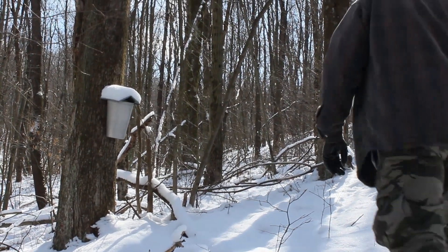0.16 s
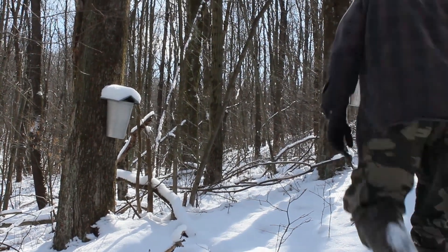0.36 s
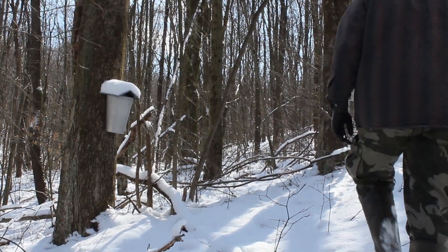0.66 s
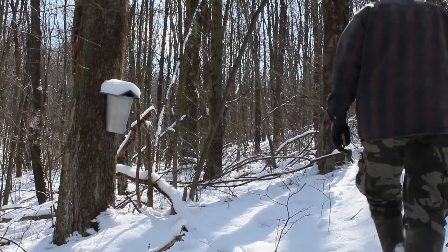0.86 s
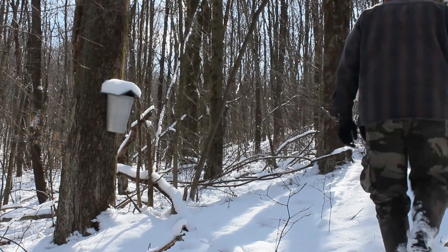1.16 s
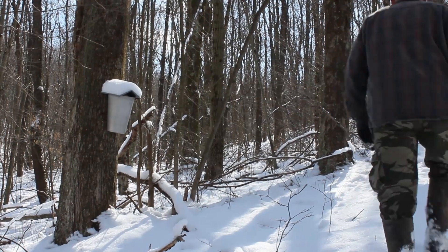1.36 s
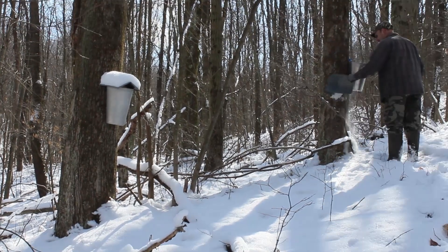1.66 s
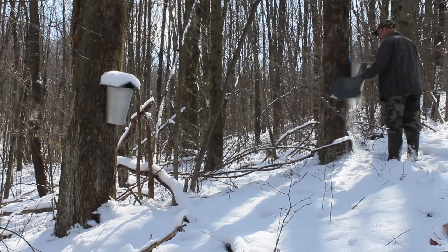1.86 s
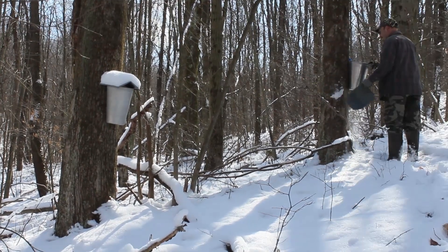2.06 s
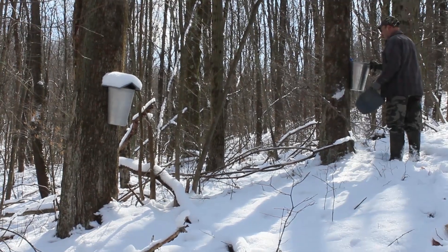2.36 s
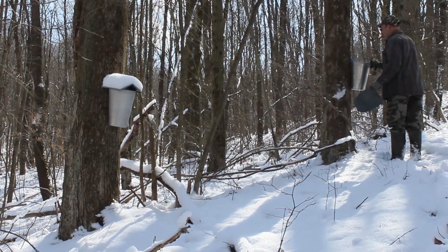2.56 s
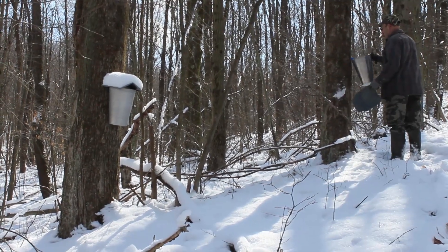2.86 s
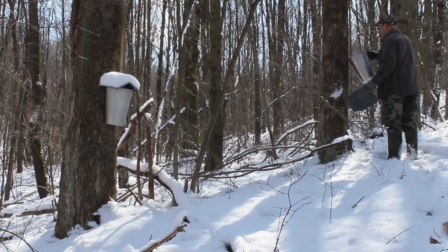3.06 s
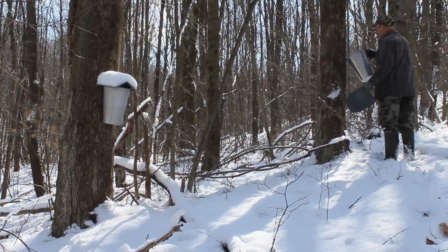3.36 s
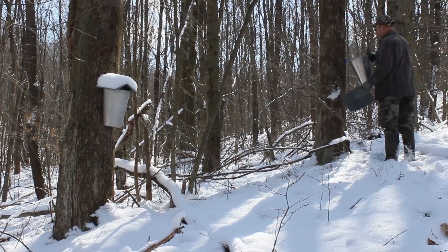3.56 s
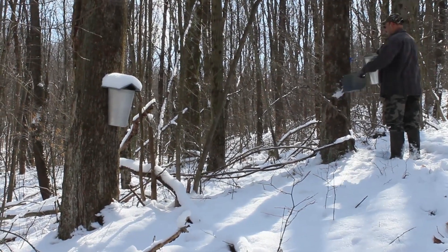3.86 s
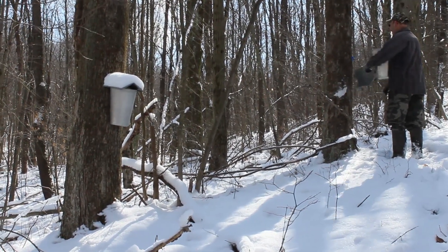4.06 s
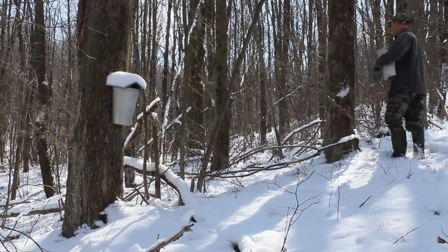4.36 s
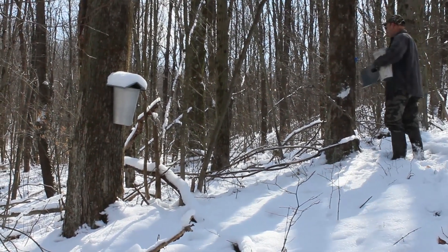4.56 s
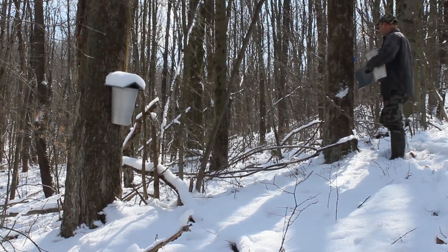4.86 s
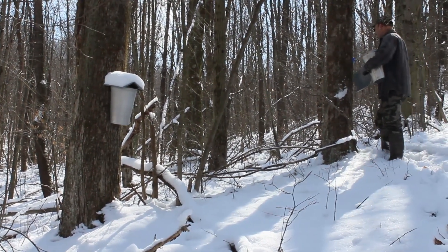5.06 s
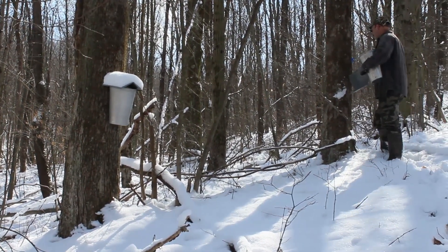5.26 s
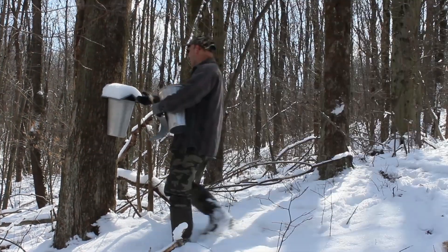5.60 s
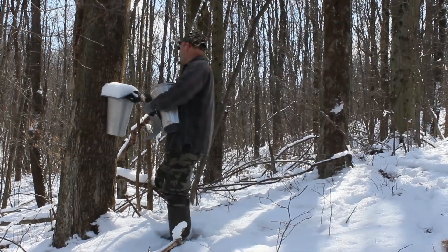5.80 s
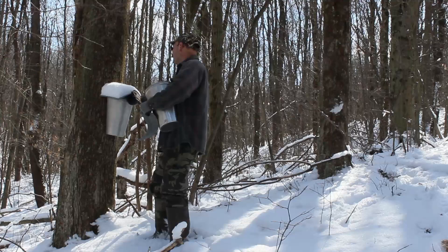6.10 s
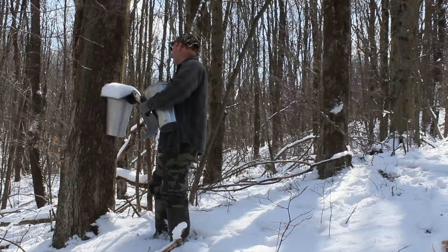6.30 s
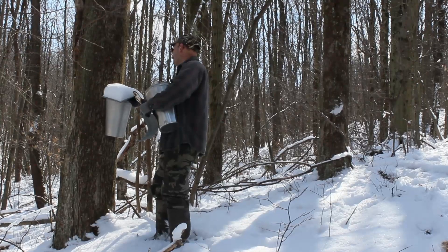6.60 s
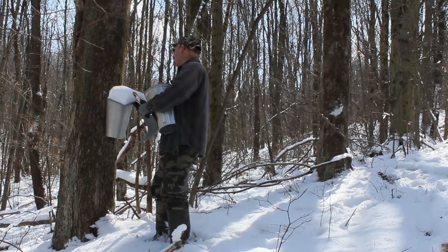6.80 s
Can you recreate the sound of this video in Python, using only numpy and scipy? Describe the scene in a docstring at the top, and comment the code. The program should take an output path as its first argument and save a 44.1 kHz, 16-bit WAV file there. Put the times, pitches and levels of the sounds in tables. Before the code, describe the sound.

For the first second, boots pass close by in packed snow with dull thuds, small snaps and a soft crunch. A few tiny, brittle ticks of crust or twigs come near 1.4 seconds. At about 1.7 seconds a tin lid some metres off gives a loud, briefly ringing clank, the strongest sound, with a short echo from the trees. Shorter, damped knocks of a metal bucket follow: a clear one at 2.2 seconds, lighter ones near 2.8 and 3.3, and another clear one at 4.2. Quieter steps thud and crunch from about 4.5 to 6 seconds. After a faint tin tap near 6.3, a glove softly scrapes snow off a nearer lid from 6.5 to 7 seconds, grainy with a slight metallic ring. Throughout, light wind rumbles in small gusts over a faint woodland hush and microphone hiss.

```python
"""Boots and tin in snowy woods

Boots thud and crunch past as the snow gives way. Some metres off, a man knocks a tin lid and bucket together;
the lid rattles against a tree trunk, damped, until a last free clank rings out, and tree trunks echo the
knocks. At the end snow scrapes off a nearer lid. Light wind rumbles, the woods murmur and each microphone
hisses."""
import sys
import numpy as np
from scipy import signal
from scipy.fft import rfft, irfft, next_fast_len
from scipy.io import wavfile
from scipy.ndimage import uniform_filter1d

SR = 44100
rng = np.random.default_rng(int(sys.argv[2]) if len(sys.argv) > 2 else 0)


def transcribe(signal):
    """Save signal, clipped to [-1, 1], as a 16-bit WAV file at the path in sys.argv[1]."""
    frames = np.atleast_2d(signal).T
    limited = np.clip(frames, -1, 1)
    pcm = np.round(limited * 32767).astype(np.int16)
    wavfile.write(sys.argv[1], SR, pcm)


N = 305875
T = np.arange(N) / SR


def undb(db):
    return 10 ** (np.asarray(db) / 20)


def unit(x):
    return x / np.sqrt(np.mean(x ** 2))


def band(x, hz, width_hz):
    """Keep the sound near one pitch."""
    return signal.lfilter(*signal.iirpeak(hz, hz / width_hz, fs=SR), x)


def steep_band(x, hz, width_hz):
    return band(band(x, hz, width_hz), hz, width_hz)


def shaped_noise(tone, channels=1):
    """Steady noise whose tone follows (Hz, dB) points."""
    size = next_fast_len(N)
    hz, db = np.transpose(tone)
    pitches = np.arange(1, size // 2 + 2) * SR / size
    gain = undb(np.interp(np.log(pitches), np.log(hz), db))
    spectrum = rfft(rng.standard_normal((channels, size)))
    return unit(irfft(spectrum * gain, size)[:, :N])


def wander(per_second):
    """A smooth random drift up and down."""
    hold = int(SR / per_second)
    steps = np.repeat(rng.standard_normal(N // hold + 1), hold)
    return uniform_filter1d(uniform_filter1d(steps, hold), hold)[:N]


def fade(t, fade_s):
    """Die away by 60 dB in the fade time."""
    return np.exp(-np.log(1000) * t / fade_s)


def add(out, start, sound, peak_db):
    i = int(start * SR)
    sound = sound[:N - i]
    out[i:i + len(sound)] += undb(peak_db) * sound / np.abs(sound).max()


# Gusts of wind. Each row: time of the peak in seconds, level in dB.
WIND_GUSTS = [(0.33, -64), (0.77, -51.5), (1.48, -63), (1.9, -46.5), (2.45, -66), (2.92, -55.5),
              (3.17, -63), (3.58, -65), (4.23, -59), (5.78, -70), (6.93, -66)]
def wind(breeze_db=-67, waver_db=5, gust_s=0.048):
    """Light wind makes a low, wavering rumble that swells in short gusts."""
    rumble = shaped_noise([(5, -11), (20, 2.5), (40, -25), (70, -15), (110, -38), (200, -56),
                           (1000, -97.5)])[0]
    breeze = undb(breeze_db + waver_db * wander(7.6))
    gusts = sum(undb(db) * np.exp(-((T - time) / gust_s) ** 2) for time, db in WIND_GUSTS)
    return rumble * (breeze + gusts)


# The tone of the woods. Each row: pitch in Hz, relative level in dB.
MURMUR_TONE = [(50, 1), (90, 1), (142, 0), (320, 0), (500, -5.5), (850, -7), (1500, -12.5), (2500, -18.5),
               (4500, -26.5), (8000, -33), (16000, -35)]
# Their slow rise and fall. Each row: time in seconds, level in dB.
MURMUR_LEVELS = [(0.0, -57), (0.55, -59.5), (1.0, -59), (4.5, -57.5), (6.2, -59)]
def woods():
    """The woods give a soft murmur that swells a little."""
    murmur = shaped_noise(MURMUR_TONE)[0] * undb(wander(14))
    return murmur * undb(np.interp(T, *np.transpose(MURMUR_LEVELS)))


# Boots on packed snow. Each row: start in seconds, peak in dB, pitch in Hz, snap in dB above that peak.
BOOT_THUDS = [(0.082, -36.5, 464, -2), (0.121, -44, 177, 11.5), (0.133, -48, 127, -1),
              (0.199, -47.5, 204, 3), (0.216, -45, 159, 5.5), (0.334, -51, 563, 8.5),
              (0.692, -36, 360, -3.5), (0.702, -35, 303, -3.5), (0.753, -39, 280, -2),
              (0.808, -38.5, 139, -2.5), (0.871, -39.5, 173, -12), (0.89, -48.5, 189, -7),
              (0.967, -34, 352, -8), (1.044, -46, 171, 3), (1.467, -54, 141, -14), (4.556, -42, 187, -38),
              (4.737, -47.5, 264, -17), (4.879, -48, 166, -21), (5.329, -50, 139, -14),
              (5.609, -43.5, 188, -1.5), (5.742, -44.5, 410, -1)]
def boots(fade_cycles=5.7):
    """Packed snow gives way with a dull knock, snapping at the start and again as it springs back."""
    out, t = np.zeros(N), T[:SR // 10]
    for start, peak_db, hz, snap_db in BOOT_THUDS:
        thud = np.cos(2 * np.pi * hz * t) * fade(t, fade_cycles / hz) * np.minimum(t / 0.0013, 1)
        add(out, start, thud, peak_db)
        for delay, drop_db in ((.0012, 0), (.0012 + 1 / hz, -3)):
            crumbs = .15 * rng.standard_normal(len(t)) * fade(t, .01)
            snap = steep_band((t == 0) + crumbs, 660, 920)  # one clean break, then crumbs
            add(out, start + delay, snap, peak_db + snap_db + drop_db)
    return out


def trunk_echoes(sound, fade_s=0.39, level_db=-21.5):
    """Tree trunks scatter short echoes, dulled by the snow."""
    t = T[:SR // 2]
    scatter = band(rng.standard_normal((2, len(t))), hz=1290, width_hz=5600)
    middle, side = scatter * fade(t, fade_s) * np.minimum(t / 0.0096, 1)
    echo = middle + 0.011 * side * np.array([[1], [-1]])
    echo /= np.sqrt((echo ** 2).sum() / 2)
    return undb(level_db) * signal.fftconvolve(sound[None], echo, axes=1)[:, :N]


def grains(per_second=3000):
    """Many tiny breaks in the snow, some larger than the rest."""
    breaks = rng.random(N) < per_second / SR
    return breaks * rng.standard_normal(N) * undb(2.2 * rng.exponential(size=N))


# How soft snow and hard crust ring. Each row: pitch in Hz, width in Hz, relative level in dB.
SOFT_TONE = [(290, 250, -2), (620, 500, 0), (1100, 800, -1), (1700, 1000, -4)]
CRUST_TONE = [(2900, 2000, 0), (4400, 1800, -1), (7800, 2200, -1)]
def snow_crackles():
    """Grains of each size ring in their own range: a low crackle for soft snow, a high one for crust."""
    return [unit(sum(undb(db) * unit(steep_band(grains(), hz, width)) for hz, width, db in tone))
            for tone in (SOFT_TONE, CRUST_TONE)]


# Steps in loose snow. Each row: start in seconds, hold in seconds, soft snow in dB, crust in dB.
STEP_CRUNCHES = [(0.1, .02, -63, -79), (0.112, 0.0094, -54, -60.5), (0.262, 0.18, -65.5, -76),
                 (0.857, 0.037, -56, -70), (0.92, 0.12, -63, -81), (1.407, .04, -89, -73),
                 (1.465, 0.0071, -59, -67.5), (5.562, .05, -69.5, -81), (5.79, 0.081, -61, -74),
                 (5.924, 0.053, -69, -72)]
def crunch(soft, crust, rise_db_per_s=600, fall_db_per_s=410):
    """Loose snow crunches under a step: the crackle rises, holds and falls."""
    out = np.zeros(N)
    for start, hold, soft_db, crust_db in STEP_CRUNCHES:
        before, after = np.maximum(start - T, 0), np.maximum(T - start - hold, 0)
        shape = undb(-rise_db_per_s * before - fall_db_per_s * after)
        out += shape * (undb(soft_db) * soft + undb(crust_db) * crust)
    return out


# Ticks of crust and twigs. Each row: start in seconds, peak in dB, treble in dB above that peak.
BRITTLE_TICKS = [(1.4117, -41, 0), (1.435, -40, -16.5), (1.4435, -41.5, 9)]
def ticks():
    """Brittle crust and twigs break with tiny, bright bursts of noise."""
    out, t = np.zeros(N), T[:SR // 10]
    for start, peak_db, treble_db in BRITTLE_TICKS:
        burst = rng.standard_normal(len(t)) * fade(t, 0.0048)
        add(out, start, band(burst, 2150, 1700), peak_db + 0.5)
        treble = steep_band(burst, 7300, 5000) + 1.5 * steep_band(burst, 18000, 5000)
        add(out, start, treble, peak_db + treble_db)
    return out


# Six pitches in Hz, low to high, at which a blow sets how strongly the tin rings.
BLOW_PITCHES = (300, 650, 1000, 1350, 1800, 2600)
# The crack of a blow. Each row: pitch in Hz, width in Hz, relative level in dB, fade time in seconds.
LOW_CRACK_BANDS = [(3300, 1440, 4, 0.044), (4460, 580, 5.5, 0.027), (5470, 3400, -11, 0.064)]
HIGH_CRACK_BANDS = [(7600, 1900, 3, 0.032), (8350, 4900, 0, 0.016), (13200, 4400, -8, 0.022)]
def struck_tin(notes, blows, swell_cycles=1.54, weak_below_hz=486):
    """Each blow rings the tin's own notes in a different mix, over a short crack of crowded high ones."""
    out, t = np.zeros(N), T[:SR // 2]
    hz, db, free_fade_s = np.transpose(notes)[:, :, None]
    swell = np.sin(np.pi / 2 * np.minimum(hz * t / swell_cycles, 1)) ** 2
    ringing = fade(t, free_fade_s) * swell * np.sin(2 * np.pi * hz * t)
    bass_cut = signal.butter(3, weak_below_hz, "high", fs=SR)  # thin tin gives off little bass
    for start, peak_db, *mix_db, low_db, high_db, grip_fade_s in blows:
        blow_db = np.interp(np.log(hz), np.log(BLOW_PITCHES), mix_db)
        gain = undb(db + blow_db + rng.standard_normal(hz.shape))
        clank = (gain * ringing).sum(axis=0) * fade(t, grip_fade_s)  # the glove or the trunk adds its own damping
        add(out, start, signal.lfilter(*bass_cut, clank), peak_db)
        for bands, crack_db in ((LOW_CRACK_BANDS, low_db), (HIGH_CRACK_BANDS, high_db)):
            crack = np.zeros(len(t))
            for pitch, width, band_db, fade_s in bands:
                noise = unit(steep_band(rng.standard_normal(len(t)), pitch, width))
                crack += undb(band_db) * fade(t, fade_s) * noise
            add(out, start, crack * np.minimum(t / 0.00013, 1), peak_db + crack_db + 4)
    return out


# The notes each tin rings with. Each row: pitch in Hz, relative level in dB, free fade time in seconds.
LID_NOTES = [(120, 24, .08), (392, -20, .08), (443, -20, .12), (533, 6, .1), (555, -4, .08), (584, -6, .45),
             (625, -5, .08), (666, 0, .36), (742, 6, .085), (827, -8, .11), (880, -1, .15), (945, -4, .16),
             (992, -9, .1), (1060, -2, .11), (1126, -7, .11), (1213, -9, .1), (1410, -4, .14),
             (1520, -4, .12), (1640, -1, .14), (1738, -3, .14), (1890, -6, .1), (2010, -6, .1),
             (2185, -3, .1), (2387, -6, .1), (2614, -8, .08)]
BUCKET_NOTES = [(125, 20, .1), (262, 10, .1), (340, 0, .1), (522, -8, .12), (650, -2, .16), (690, -1, .07),
                (745, -2, .06), (815, -4, .07), (890, -7, .1), (1058, -7, .12), (1137, -3, .1),
                (1195, -4, .1), (1326, 0, .14), (1436, -6, .1), (1525, -13, .1), (1634, -5, .12),
                (1735, 1, .2), (1875, -4, .1), (1975, 0, .14), (2091, -7, .1), (2252, -7, .1),
                (2385, -11, .1), (2620, -8, .14), (2933, -12, .08)]
# Blows on each tin. Each row: start in seconds, peak in dB, six relative levels in dB at BLOW_PITCHES, # low
# and high crack as relative levels in dB, fade time the grip or contact allows in seconds.
LID_KNOCKS = [(1.658, -9.5, -22, 19, 6, -6, -11, -9, -28.5, -29.5, 0.11),
              (1.665, -8.5, -42, -0.5, 0, -16.5, -16, -20, -52, -50, 0.045),
              (1.674, -16.5, -40, 7.5, -25, -9, -4, -10, -34, -36, 0.038),
              (1.681, -22, -14, -2.5, -8.5, -9, -22, -25, -39, -33, 2.5)]
BUCKET_KNOCKS = [(2.244, -17, -39, -14.5, -20, -9, -14, -16, -18.5, -21, 0.03),
                 (2.253, -31.5, -29, -11, -17, -22, -17, -11, -10, -19, 0.11),
                 (2.497, -52.5, -14, -20, -17, -15, -19, -14, -4, -5, 0.044),
                 (2.617, -50, -17, -17, 1, -9, -15, -13, -12, -7, 0.11),
                 (2.762, -39, -32, -16, -9, -11, -11, -7, -15.5, -34, 0.042),
                 (3.347, -32.5, -33, -5, -34, -14, -7.5, -21, -21, -20, 0.073),
                 (3.519, -53, -10, 0, -20, -25, -27, -27, -7, -19, 0.055),
                 (3.989, -50, -20, -18, -16, -14, -15, -3, -7, -12, 0.082),
                 (4.216, -26.5, -12, -20, -6, -22, -9.5, -12, -10.5, -16.5, 0.051),
                 (4.229, -38.5, -5, -16, -12, -15, -16, -14, -13, -16, 0.05),
                 (4.907, -50.5, -1, -17, -20, -24, -6, -13, -14, -7, 0.055),
                 (6.348, -50, 0, -5, -5, -8, -16, -18, -8, -3, 0.03)]
def lid_and_bucket():
    """The lid clanks and rings freely, then the bucket gives short knocks, damped by gloves."""
    return struck_tin(LID_NOTES, LID_KNOCKS) + struck_tin(BUCKET_NOTES, BUCKET_KNOCKS)


# Snow scraped off the near lid. Each row: time in seconds, soft snow in dB, crust in dB.
# The first row's faint crackle is there from the start of the scene.
SCRAPE_LEVELS = [(6.3, -86, -72), (6.47, -60, -71), (6.53, -54.5, -67), (6.62, -53, -60.5), (6.7, -56, -64),
                 (6.75, -61.5, -65), (6.8, -54.5, -60), (6.86, -55, -62.5), (6.936, -58.5, -62)]
def scrape(soft, crust, tin_db=-10.5, note_width_hz=33):
    """A glove scrapes snow off a lid, and the tin rings along under its load."""
    times, soft_db, crust_db = np.transpose(SCRAPE_LEVELS)
    soft_gain, crust_gain = undb(np.interp(T, times, soft_db)), undb(np.interp(T, times, crust_db))
    rub = grains()
    # this lid borrows the bucket's notes, all but the lowest
    ring = unit(sum(undb(db) * band(rub, hz, note_width_hz) for hz, db, _ in BUCKET_NOTES[1:]))
    return (soft + undb(tin_db) * ring) * soft_gain + crust * crust_gain


def scene():
    """Mix the knocks, their echoes, the snow and the air."""
    knocks = lid_and_bucket() + boots() + ticks()
    echoes = trunk_echoes(knocks)
    soft, crust = snow_crackles()
    snow = crunch(soft, crust) + scrape(soft, crust)
    surges = undb(1.8 * wander(35))  # grains break together in quick surges
    return knocks + echoes + snow * surges + wind() + woods()


# The tone of the microphone hiss. Each row: pitch in Hz, relative level in dB.
HISS_TONE = [(12, -62), (20, -25), (60, -10), (96, -6.5), (642, -4.5), (825, -7), (1190, -4), (1400, -8.5),
             (12800, -9.5), (16000, -10)]
def record(dry):
    """Each microphone adds its own hiss, and the highest treble is cut."""
    hiss_db, top_hz = -60.5, 15850
    hiss = undb(hiss_db) * shaped_noise(HISS_TONE, channels=2)
    treble_cut = signal.ellip(10, .2, 60, top_hz, fs=SR, output="sos")
    return signal.sosfilt(treble_cut, dry + hiss)


dry = scene()
out = record(dry)
transcribe(out)
```